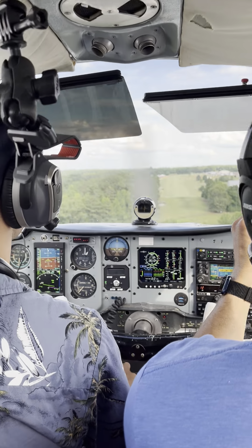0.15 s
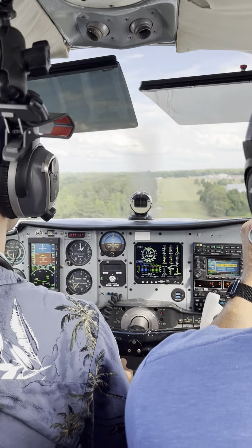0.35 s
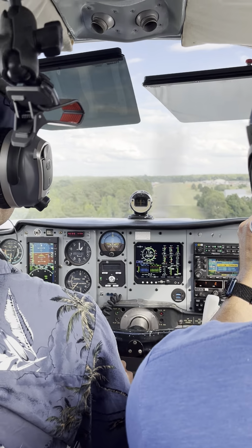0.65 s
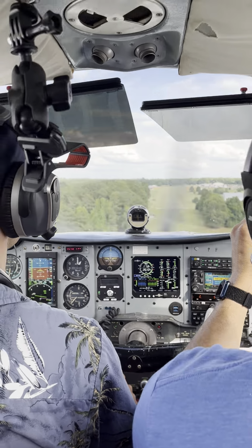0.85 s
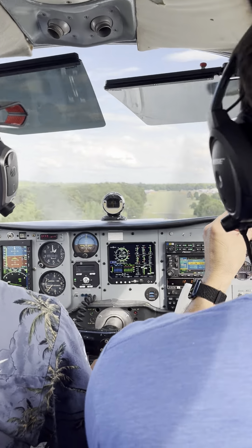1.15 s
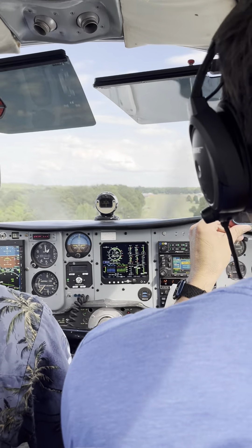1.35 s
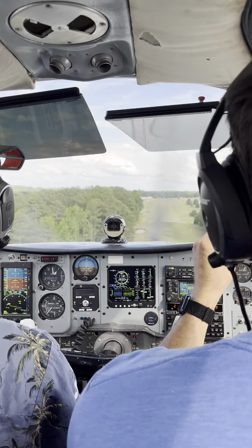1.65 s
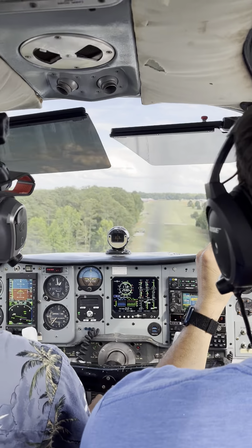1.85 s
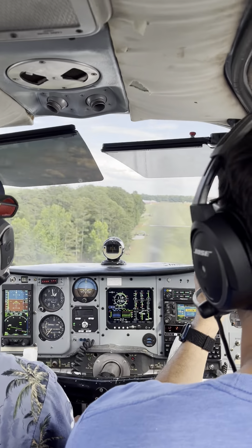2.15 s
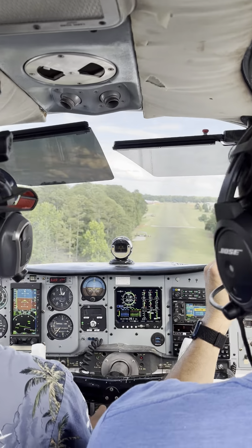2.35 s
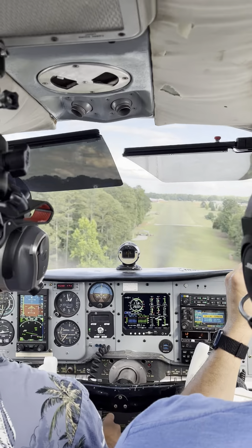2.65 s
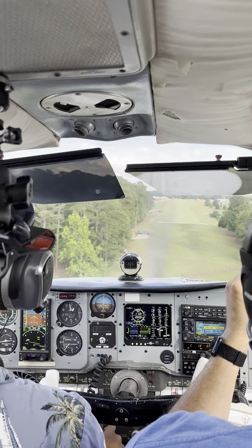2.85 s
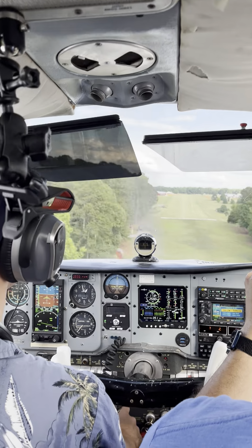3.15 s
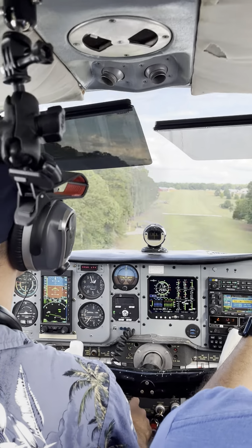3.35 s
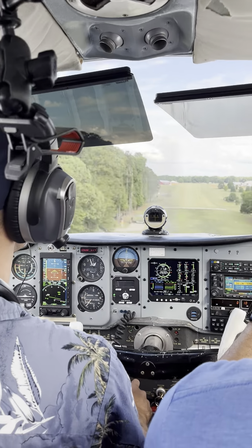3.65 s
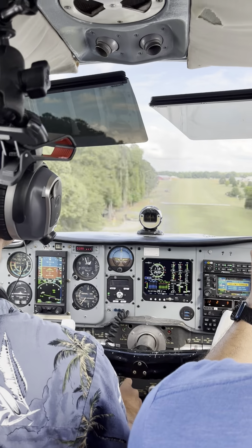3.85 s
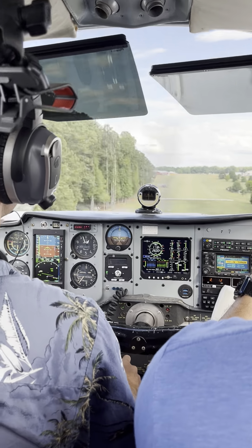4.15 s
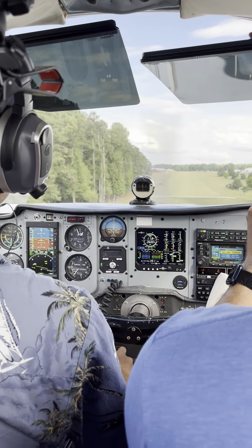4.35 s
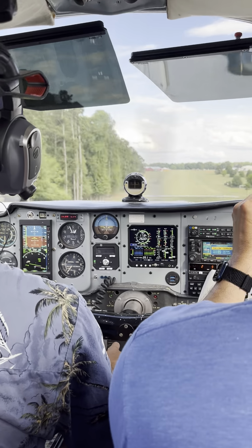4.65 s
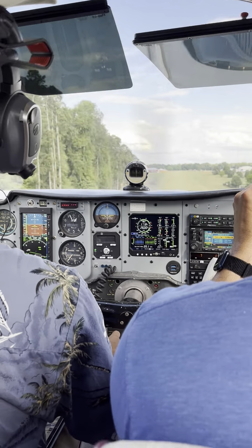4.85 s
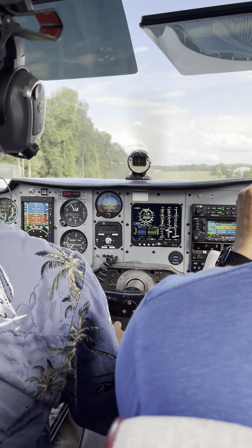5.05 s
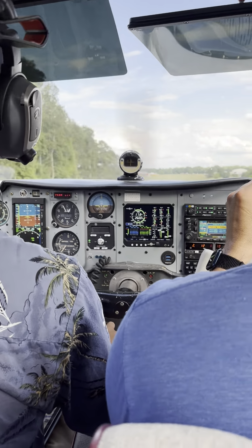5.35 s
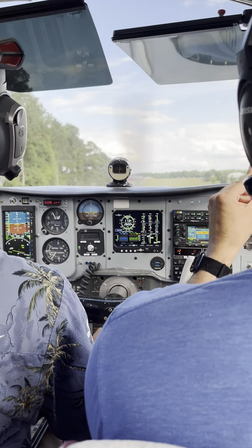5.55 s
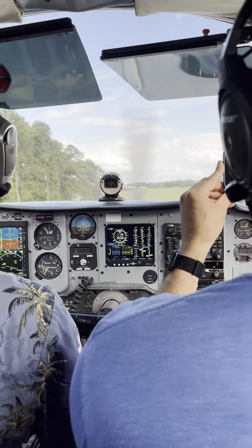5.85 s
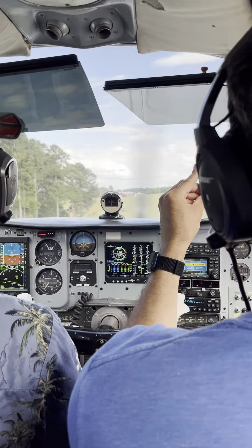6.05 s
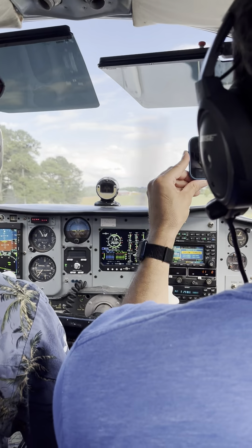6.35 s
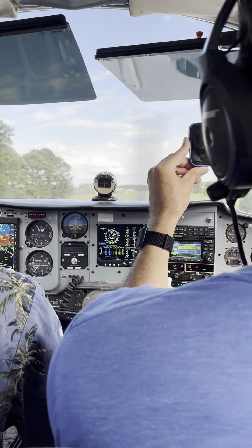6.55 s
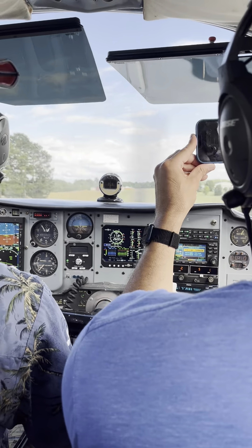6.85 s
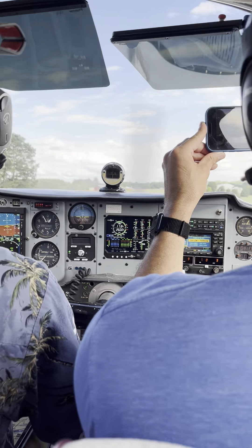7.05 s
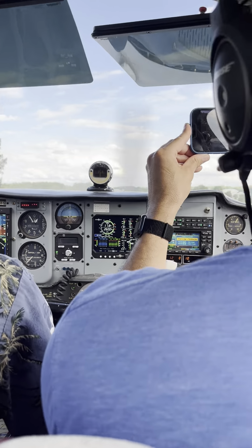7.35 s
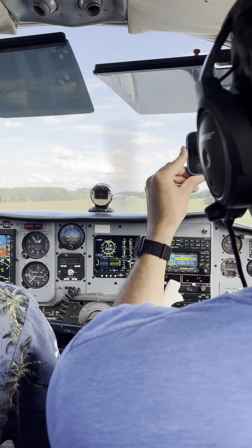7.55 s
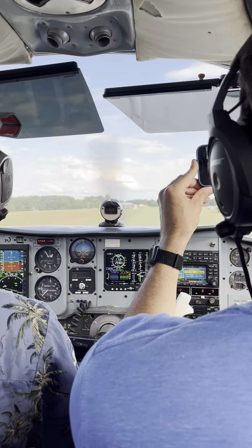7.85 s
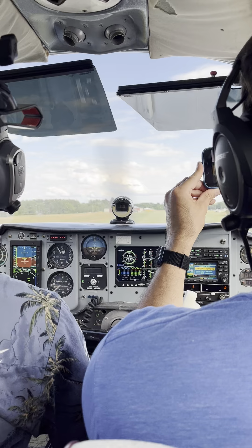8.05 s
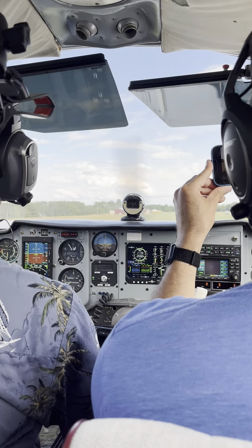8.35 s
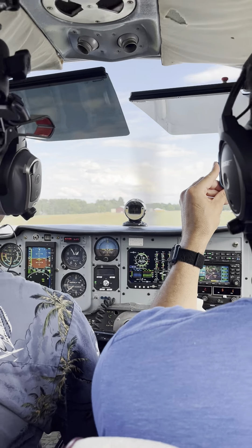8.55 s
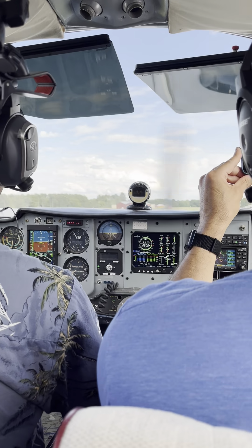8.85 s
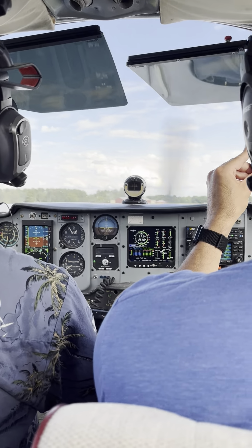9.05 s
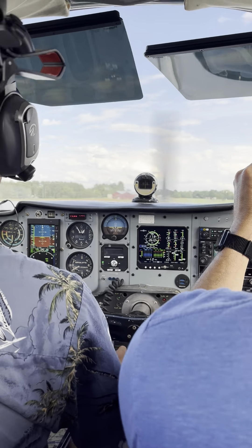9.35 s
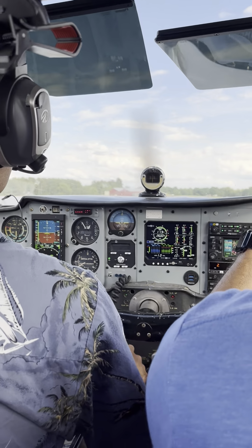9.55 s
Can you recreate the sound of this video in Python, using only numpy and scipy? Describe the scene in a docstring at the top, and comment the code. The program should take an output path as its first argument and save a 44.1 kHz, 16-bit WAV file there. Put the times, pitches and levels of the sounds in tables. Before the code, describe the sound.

Continuous loud cabin noise of a light aircraft: deep throbbing engine and propeller hum at fixed pitch, vibrating panels, rushing air and a fine leak hiss. Irregular draughts slap and snap at the handheld microphone at the start, a heavy buffet follows around three seconds with small flutters after it, then the full drone settles, swelling and ebbing slightly. Two short pairs of soft wind thumps arrive past eight seconds.

```python
"""Light aircraft cabin in flight

A piston engine and propeller drone at a governed speed: sine lines on the engine cycle, each wavering.
Shaped noise makes the rumbling airframe, the slipstream rushing past and the air hissing in from the left.
Draughts buffet the microphone now and then, and filtered pulses are the eddies that slap, crack and thump.
Around the stronger draughts the bass sinks and creeps back."""
import sys
import numpy as np
from scipy import signal
from scipy.fft import rfft, irfft, next_fast_len
from scipy.io import wavfile
from scipy.ndimage import uniform_filter1d, minimum_filter1d

SR = 44100
rng = np.random.default_rng(int(sys.argv[2]) if len(sys.argv) > 2 else 0)


def to_wav(s):
    """Save 16-bit WAV."""
    ch = np.atleast_2d(s).T  # columns
    pcm = np.round(np.clip(ch, -1, 1) * 32767)  # PCM
    wavfile.write(sys.argv[1], SR, pcm.astype(np.int16))


N = 427329
TIME = np.arange(N) / SR   # s

CYCLE_HZ = 21.665   # mean rate of four-stroke cycles, two turns of the crank each
FIRINGS = 6   # per cycle
DRONE_DB = -18   # before the bass dips
FIRING_ROUGH_DB, FIRING_ROUGH_PER_S = 1.8, 28   # the firings differ in strength
SMEAR_HZ, SMEAR_RAD = 420, .5   # lines above this pitch wander further in phase, by so much

# engine and propeller lines: (multiple of the cycle rate, relative level [dB])
ENGINE_LINES = [(2, -27), (3, -32), (4, -17), (5, -19.5), (6, 0.5), (7, -22), (8, -11), (9, -10), (10, -16),
                (11, -26), (12, -12), (13, -15), (14, -14.5), (15, -14.5), (16, -16), (17, -25),
                (18, -15.5), (21, -33.5), (22, -29), (23, -29), (26, -25.5), (28, -26.5), (31, -42),
                (38, -35), (42, -28.5)]
# swell and ebb of the firing note: (time [s], gain [dB])
FIRING_SWELL = [(0, 1), (4.9, -0.5), (5.75, 3), (6.1, -4), (6.9, 2.5), (7.55, -5), (8.0, 4), (9.2, -3.5),
                (9.69, -2)]
# cabin sound in the stereo image: (frequency [Hz], correlation, phase lead of the left [rad])
CABIN_STEREO = [(60, 1, -0.12), (140, 1, -0.19), (300, 1, -0.38), (710, 0.7, -0.52), (1400, 0.86, -0.54),
                (1920, 0.99, -0.38), (2930, 0.17, 1), (5000, .21, 0.083)]


def engine(cycles, waver_db=2.0, phase_wander=0.27):
    """Lines on the engine cycle; uneven combustion and churned air make each one waver."""
    lines = np.zeros((2, N))
    swell = gains(FIRING_SWELL)[0]
    for multiple, level_db in ENGINE_LINES:
        firing = multiple == FIRINGS
        unsteady = .7 if firing else 1   # the firing note is the steadier one
        wander = unsteady * phase_wander + SMEAR_RAD * (multiple * CYCLE_HZ > SMEAR_HZ)
        phase = 2 * np.pi * (multiple * cycles + rng.random()) + wander * drift(2.8)
        lead = at_hz(CABIN_STEREO, multiple * CYCLE_HZ)[1]
        level = from_db(level_db + unsteady * waver_db * drift(5.0))
        if firing:
            level = level * swell
        lines += level * np.sin([phase, phase - lead])
    rough = from_db(FIRING_ROUGH_DB * drift(FIRING_ROUGH_PER_S))
    drone = rms_one(rough * lines)
    return from_db(DRONE_DB) * bass_dip(DIP_DB, DRONE_RETURN_S) * drone


RUMBLE_DB = -19.5   # before the bass dips
LOPE_DB = 1.5   # throb once a cycle
SHUDDER_DB, SHUDDER_PER_S = 1.0, 20   # random shudder
DEEP_HZ, DEEP_RETURN_S = 74.5, 0.56   # top edge and return time of the deepest rumble

# colour of the rumble: (frequency [Hz], relative spectrum level [dB])
RUMBLE_COLOUR = [(15, -55), (28, -29), (42, -16), (60, -0.5), (80, 1), (120, -5), (190, -6.5), (250, -14.5),
                 (380, -18), (600, -20.5), (1000, -35), (2500, -79)]
# the deepest rumble sinks further, and later: (start [s], end [s], gain [dB])
DEEP_DIPS = [(1.0, 1.7, -1), (4.65, 5.35, -8)]


def airframe(cycles, crank_throb_db=0.5, blade_throb_db=2.0):
    """Panels and cabin air shaken with each cycle, turn of the crank and every second firing."""
    beat_db = LOPE_DB * np.sin(2 * np.pi * cycles)
    beat_db += crank_throb_db * np.sin(2 * np.pi * 2 * cycles)
    beat_db += blade_throb_db * np.sin(np.pi * FIRINGS * cycles)
    throb = rms_one(from_db(beat_db + SHUDDER_DB * drift(SHUDDER_PER_S)))
    level = from_db(RUMBLE_DB) * throb * bass_dip(DIP_DB, RUMBLE_RETURN_S)
    rumble = level * air_noise(RUMBLE_COLOUR, CABIN_STEREO)
    deep_db = sum(db * held(start, end, DIP_FALL_S, DEEP_RETURN_S) for start, end, db in DEEP_DIPS)
    return shelf(rumble, DEEP_HZ, "low", from_db(deep_db))


DIP_DB, DIP_FALL_S = -13, 0.33
DRONE_RETURN_S, RUMBLE_RETURN_S = 0.21, 0.43

# the bass is down around the stronger draughts: (start [s], end [s])
BASS_DIPS = [(0, 1.644), (3.63, 4.41)]


def bass_dip(depth_db, return_s):
    """Gain of a low layer that sinks in every dip and returns at its own pace."""
    return from_db(depth_db * sum(held(start, end, DIP_FALL_S, return_s) for start, end in BASS_DIPS))


LUMP_DB = 2.5   # unevenness of the buffeting
PATTER_DB, SNAP_DB = -8, -10   # small eddies, relative to the draught and to its edge

# colours of buffeting and tearing edge: (frequency [Hz], relative spectrum level [dB])
BUFFET_COLOUR = [(15, -50), (28, -15), (45, -1), (70, 4.5), (120, 0), (200, -3), (280, -7), (450, -10.5),
                 (700, -21.5), (1200, -40), (3000, -79)]
TEAR_COLOUR = [(200, -32), (500, -0.5), (850, 0), (1400, -9), (2100, -29), (4500, -23), (8000, -57)]
# draughts in the stereo image: (frequency [Hz], correlation, phase lead of the left [rad])
DRAUGHT_STEREO = [(60, .98, -0.42), (130, .97, -0.55), (300, 0.98, -1.2), (650, 0.99, -1.1),
                  (1100, .98, -.6), (1800, 0.98, -0.6)]


def draughts(buffet_db=4.5, crackle_db=4.0):
    """Air breaks up at the microphone: low buffeting, a patter of small eddies, a crackling edge."""
    strength, edge = draught_strength()
    lumps = rms_one(from_db(LUMP_DB * np.minimum(drift(76), 1.5)))
    crackle = rms_one(from_db(crackle_db * drift(160)))
    buffeting = from_db(buffet_db) * air_noise(BUFFET_COLOUR, DRAUGHT_STEREO)
    tearing = crackle * air_noise(TEAR_COLOUR, DRAUGHT_STEREO)
    patter = from_db(PATTER_DB) * eddy_pulses(160, top_hz=420)
    snaps = from_db(SNAP_DB) * eddy_pulses(200, top_hz=1510)
    noise = lumps * (buffeting + edge * tearing)
    return strength * (noise + stereo_phase(patter + edge * snaps))


DRAUGHT_ATTACK_S, DRAUGHT_RELEASE_S = 0.075, 0.088   # time to rise and to fall by 20 dB

# draughts, level before the layer gains:
# (start [s], length [s], strength [dB], tearing edge relative to it [dB])
DRAUGHTS = [(0.004, 0.11, -26.5, -8), (0.175, 0.16, -27, -5), (.24, .03, -25, -1), (.38, 0.32, -28.5, -7),
            (0.795, .13, -23, -2.5), (1.0, 0.17, -32, -6), (3.115, .05, -19.5, -17), (3.165, .28, -18, -15),
            (3.275, 0.11, -25, -2), (3.5, .11, -24, -25), (3.73, 0.08, -33, -14), (3.875, 0.09, -30, -12),
            (4.025, 0.06, -32, -11)]


def draught_strength():
    """Each draught rises, holds and dies away; gives overall strength and the edge's share."""
    buffet, tear = 1e-12, 1e-14   # power
    for start, length, level_db, edge_db in DRAUGHTS:
        before = (start - TIME) / DRAUGHT_ATTACK_S
        after = (TIME - start - length) / DRAUGHT_RELEASE_S
        gain = from_db(level_db - 20 * np.clip(np.maximum(before, after), 0, 10))
        buffet = buffet + gain ** 2
        tear = tear + (gain * from_db(edge_db)) ** 2
    return np.sqrt(buffet), np.sqrt(tear / buffet)


# large slow eddies: (time [s], level [dB])
THUMPS = [(0.097, -17), (.186, -18), (.251, -13), (.276, -17), (.696, -17), (.79, -14), (0.835, -11),
          (.904, -15), (.922, -13), (1.036, -16), (3.118, -8), (3.15, -5.5), (3.183, -3.5), (3.206, -6.5),
          (3.229, -6.5), (3.261, -2.5), (3.288, -3), (3.323, -3), (3.349, -8), (3.39, -11), (3.421, -9),
          (3.44, -7.5), (3.475, -7.5), (3.791, -15), (3.881, -13), (3.924, -17), (3.94, -14.5),
          (3.961, -17), (8.146, -11), (8.271, -5), (8.449, -6.5), (8.495, -11)]


def thumps(wake_s=0.0035, wake_db=-26.5, low_hz=48, top_hz=175, soften_hz=300):
    """Large slow eddies give the microphone a dull push."""
    return stereo_phase(sum(eddy(s, db, low_hz, top_hz, soften_hz, wake_s, wake_db) for s, db in THUMPS))


# strong, faster eddies, before the overall trim: (time [s], level [dB], low edge [Hz], top edge [Hz])
SLAPS = [(0.034, -23, 250, 800), (0.08, -20.5, 250, 1600), (0.098, -16, 200, 850), (.181, -23, 250, 1000),
         (.241, -16.5, 600, 2400), (.249, -18.5, 300, 1500), (.27, -21.5, 650, 2100), (.32, -17, 400, 1600),
         (.34, -21, 450, 1500), (.38, -23, 700, 1600), (.42, -20.5, 300, 1150), (.44, -24.5, 750, 1400),
         (.463, -21, 300, 1600), (.55, -22, 300, 1050), (.6, -17, 280, 1800), (.735, -22, 300, 1300),
         (.778, -23, 600, 1300), (.799, -14.5, 300, 1350), (.808, -14.5, 650, 1500), (.824, -14, 330, 1500),
         (.853, -19, 230, 650), (.864, -16.5, 450, 1300), (.882, -15.5, 300, 1150), (.891, -19, 600, 1400),
         (.917, -13.5, 550, 2000), (.926, -16.5, 350, 1250), (.954, -24, 250, 800), (1.175, -24, 250, 900),
         (3.134, -15, 170, 480), (3.177, -13.5, 300, 1400), (3.202, -13, 170, 550), (3.212, -9, 230, 1200),
         (3.218, -12.5, 250, 1100), (3.233, -10.5, 210, 1050), (3.246, -13.5, 260, 1400),
         (3.259, -12, 220, 1100), (3.275, -14.5, 180, 900), (3.3, -8.5, 250, 1300),
         (3.318, -10.5, 220, 900), (3.331, -13, 180, 900), (3.342, -9, 230, 1000), (3.349, -16, 400, 1400),
         (3.363, -16.5, 250, 1100), (3.377, -8.5, 220, 1050), (3.391, -15.5, 170, 800),
         (3.408, -8.5, 210, 1150), (3.43, -7.5, 200, 800), (3.45, -10.5, 210, 1000),
         (3.465, -14, 230, 1000), (3.496, -15.5, 170, 700), (3.543, -16, 170, 470),
         (3.558, -16.5, 190, 680), (3.713, -20, 280, 950), (3.76, -21.5, 280, 1200), (3.781, -26, 250, 750),
         (3.883, -23, 250, 900), (3.903, -25, 250, 750), (3.933, -21.5, 330, 1600),
         (4.024, -23.5, 450, 1250), (4.039, -24, 280, 900), (4.117, -24, 280, 1100), (8.226, -16, 200, 480),
         (8.264, -18.5, 200, 1000), (8.276, -21, 250, 700), (8.441, -15, 260, 1800), (8.48, -14, 160, 850)]


def slaps(wake_s=0.0033, wake_db=-17.0, trim_db=-0.5):
    """Small fast eddies slap the microphone, each in its own band and fullest near the low edge."""
    out = np.zeros(N)
    for s, db, low_hz, top_hz in SLAPS:
        out += eddy(s, db + trim_db, low_hz, top_hz, 2 * low_hz, wake_s, wake_db)
    return stereo_phase(out)


# the sharpest eddies, before the treble cut: (time [s], level [dB])
CRACKS = [(.7985, -23), (.8075, -27), (.8205, -24), (.916, -19.5), (3.247, -21), (3.3, -29), (3.342, -26)]


def cracks(wake_s=0.0013, wake_db=-14.0, low_hz=1400, top_hz=4900, soften_hz=1500):
    """The sharpest eddies break with a thin, very short crack."""
    out = sum(eddy(s, db, low_hz, top_hz, soften_hz, wake_s, wake_db) for s, db in CRACKS)
    treble_cut = signal.butter(6, 5700, fs=SR, output="sos")
    return stereo_phase(signal.sosfilt(treble_cut, out + 1e-18))


EDDY_S = .004   # an eddy's level is its energy spread over this time


def eddy(s, db, low_hz, top_hz, soften_hz, wake_s, wake_db, size=4096):
    """One pressure pulse with a short turbulent wake, softened and held to a band."""
    out, t = np.zeros(N), np.arange(size) / SR
    wake = from_db(wake_db) * rng.standard_normal(size) * np.exp(-t / wake_s)
    push = (t == 0) + wake
    push = signal.sosfilt(signal.butter(1, soften_hz, fs=SR, output="sos"), push)
    burst = signal.sosfilt(signal.butter(3, [low_hz, top_hz], "band", fs=SR, output="sos"), push)
    burst /= np.sqrt(np.sum(burst ** 2) / (EDDY_S * SR))
    start = round(s * SR)
    out[start:start + size] = rng.choice([-1, 1]) * from_db(db) * burst
    return out


def eddy_pulses(per_s, top_hz, spread_db=6.5):
    """Eddies arrive at random; each is one rounded pressure pulse of its own size and sign."""
    size = from_db(spread_db * np.clip(rng.standard_normal(N), -1.5, 1.5)) * rng.choice([-1, 1], N)
    hits = size * (rng.random(N) < per_s / SR) + 1e-18
    band = signal.butter(3, [top_hz / 5, top_hz], "band", fs=SR, output="sos")
    return rms_one(signal.sosfilt(band, hits))


def stereo_phase(x):
    """Shift the phase between left and right for the draught sounds."""
    size = next_fast_len(N, real=True)
    hz = np.maximum(np.arange(size // 2 + 1) * SR / size, 1)
    lead = at_hz(DRAUGHT_STEREO, hz)[1]
    return irfft(rfft(x, size) * np.exp(.5j * np.array([lead, -lead])), size)[:, :N]


# strength of the slipstream: (time [s], level [dB])
SLIPSTREAM = [(0, -30), (1.7, -32.5), (2.15, -28), (3.05, -28.5), (4.4, -32.5), (6.2, -30), (7.3, -32),
              (8.4, -30), (9.69, -33)]
# colour of the slipstream: (frequency [Hz], relative spectrum level [dB])
SLIPSTREAM_COLOUR = [(100, -29), (300, -1.5), (550, -0.5), (800, -0.5), (1050, -1.5), (1450, -1.5),
                     (1900, -5), (2400, -7.5), (3200, -14.5), (4500, -19.5), (6000, -56), (12000, -72)]


def slipstream(cycles, throb_db=-0.7, churn_db=0.64):
    """Turbulent air rushing past, pulsing faintly with the engine's firing note."""
    strength = gains(SLIPSTREAM)[0]
    throb = from_db(throb_db * np.sin(2 * np.pi * FIRINGS * cycles) + churn_db * drift(20))
    return strength * throb * fine_ripple(air_noise(SLIPSTREAM_COLOUR, CABIN_STEREO))


HISS_FLUTTER_DB = .35

# hiss before the make-up gain: (time [s], level [dB], treble shelf relative to it [dB])
HISS = [(0, -39, -1.5), (1.1, -36.5, -3), (2.8, -39.5, 1.5), (4.4, -37, -4), (8.7, -39, 0.5),
        (9.69, -38, -5)]
# colour of the hiss: (frequency [Hz], relative spectrum level [dB])
HISS_COLOUR = [(1200, -42), (1800, -8.5), (2200, -2), (2650, 1), (3200, -6), (3900, -8.5), (4700, -10),
               (5400, -8.5), (6500, -14.5), (8000, -15.5), (9800, -14.5), (11800, -19.5), (15500, -24.5)]
# hiss in the stereo image: (frequency [Hz], correlation, phase lead of the left [rad])
HISS_STEREO = [(2030, 1, 1.1), (2650, 0.89, 3.42), (3320, 0.49, 1.8), (3860, 0.22, 1.66),
               (4910, 0.93, 1.07), (5900, 1, 3.03), (8100, 0.95, 6.4), (9810, 1, 8.73), (13070, 1, 12.8),
               (14100, 0.96, 15.7)]


def air_leak(makeup_db=6.0):
    """Air enters from the left as a smooth hiss with a slight flutter."""
    level, sheen = gains(HISS)
    flutter = from_db(makeup_db + HISS_FLUTTER_DB * drift(12))
    hiss = flutter * level * fine_ripple(air_noise(HISS_COLOUR, HISS_STEREO))
    return shelf(hiss, 7300, "high", sheen)


def fine_ripple(x, echo_db=-22.0, count=8):
    """Faint random short echoes give the noise a fine ripple."""
    out = x.copy()
    for lag in (rng.uniform(.002, .018, count) * SR).astype(int):
        out[:, lag:] += from_db(echo_db) * rng.choice([-1, 1]) * x[:, :-lag]
    return rms_one(out)


def air_noise(colour, stereo):
    """Stereo noise of a given colour, partly alike and shifted in phase between left and right."""
    size = next_fast_len(N, real=True)
    hz = np.maximum(np.arange(size // 2 + 1) * SR / size, 1)
    mid, side = rfft(rng.standard_normal((2, size))) * from_db(at_hz(colour, hz)[0])
    alike, lead = at_hz(stereo, hz)
    alike = np.clip(alike, -1, 1)
    mid, side = np.sqrt(1 + alike) * mid, np.sqrt(1 - alike) * side
    left, right = mid + side, (mid - side) * np.exp(-1j * lead)
    return rms_one(irfft(np.array([left, right]), size)[:, :N])


def shelf(x, hz, kind, gain):
    """Raise or lower the part of a sound below or above a frequency."""
    part = signal.sosfiltfilt(signal.butter(2, hz, kind, fs=SR, output="sos"), x)
    return x + (gain - 1) * part


def held(start, end, attack_s, release_s):
    """Goes from 0 to 1 before the start, holds, and falls back after the end."""
    rise = 1 + (TIME - start) / attack_s
    fall = 1 + (end - TIME) / release_s
    return np.clip(np.minimum(rise, fall), 0, 1)


def drift(rate):
    """Smooth chance with spread 1 that changes about rate times a second."""
    r = np.exp(-80 * np.pi * rate / SR)   # two equal poles, run at a 40th of the sample rate
    slow = signal.lfilter([1], [1, -2 * r, r * r], rng.standard_normal(N // 40 + 2002))[2000:]
    return np.interp(np.arange(N) / 40, np.arange(len(slow)), rms_one(slow))


def from_db(db):
    """Decibels to gain."""
    return 10 ** (np.asarray(db) / 20)


def rms_one(x):
    """Scale to unit power."""
    return x / np.sqrt(np.mean(x ** 2) + 1e-20)


def gains(rows):
    """The dB columns of a curve as gains per sample."""
    s, *columns = np.transpose(rows)
    return [from_db(np.interp(TIME, s, c)) for c in columns]


def at_hz(points, hz):
    """Read each column of a table on a log-frequency axis."""
    f, *columns = np.transpose(points)
    return [np.interp(np.log(hz), np.log(f), c) for c in columns]


# slipstream and hiss dip briefly as the strongest draught ends
AIR_DIP_START_S, AIR_DIP_END_S, AIR_DIP_DB = 3.45, 3.59, -6
AIR_DIP_FALL_S, AIR_DIP_RETURN_S = 0.29, 0.099


def scene(hunting=0.001015):
    """The governor holds the speed within a hair; all sources meet at the microphone."""
    cycles = np.cumsum(CYCLE_HZ * (1 + hunting * drift(0.56))) / SR
    dip = held(AIR_DIP_START_S, AIR_DIP_END_S, AIR_DIP_FALL_S, AIR_DIP_RETURN_S)
    airflow = from_db(AIR_DIP_DB * dip) * (slipstream(cycles) + air_leak())
    wind_on_mic = draughts() + thumps() + slaps() + cracks()
    return engine(cycles) + airframe(cycles) + wind_on_mic + airflow


CUTOFF_HZ = 15700


def record(dry, size=220, low_cut_hz=31):
    """The microphone drops the lowest rumble; a limiter turns the highest peaks down; the top is cut."""
    sound = signal.sosfilt(signal.butter(6, low_cut_hz, "high", fs=SR, output="sos"), dry)
    room = np.minimum(1, .93 / (np.abs(sound).max(axis=0) + 1e-9))   # one gain for both channels
    limited = sound * uniform_filter1d(minimum_filter1d(room, size), size)
    return signal.sosfilt(signal.ellip(10, .1, 80, CUTOFF_HZ, fs=SR, output="sos"), limited)


dry = scene()
out = record(dry)
to_wav(out)
```